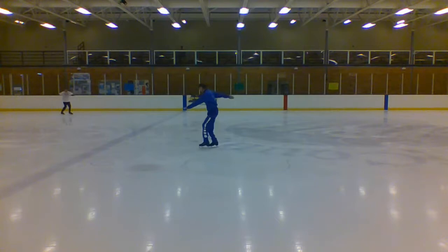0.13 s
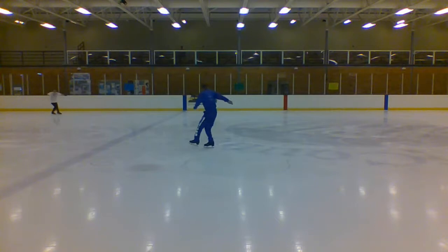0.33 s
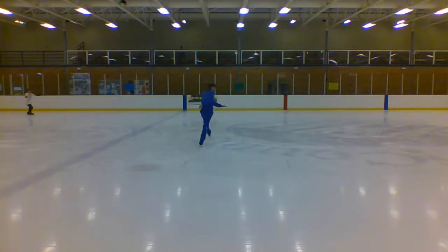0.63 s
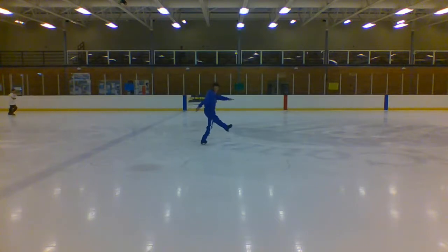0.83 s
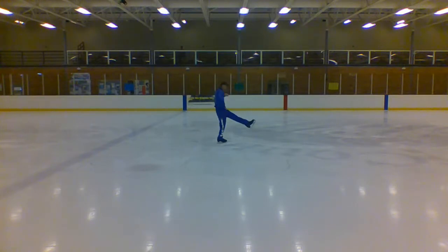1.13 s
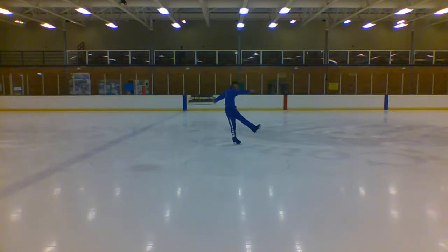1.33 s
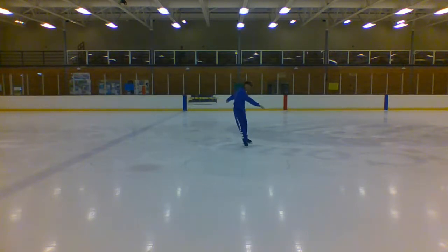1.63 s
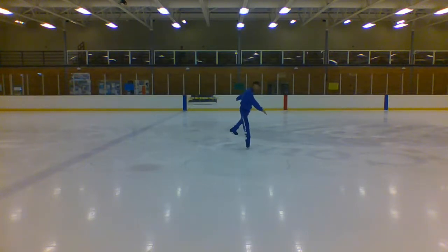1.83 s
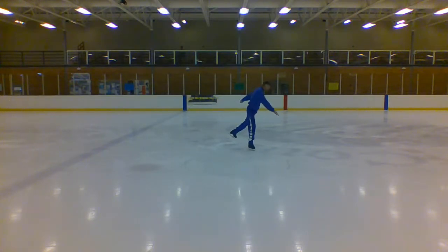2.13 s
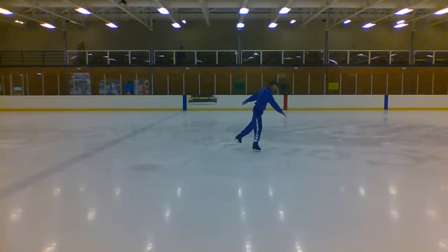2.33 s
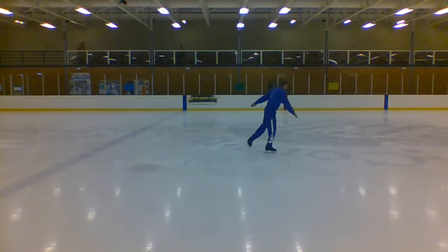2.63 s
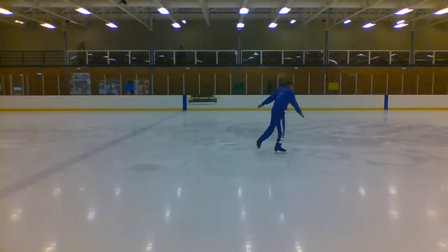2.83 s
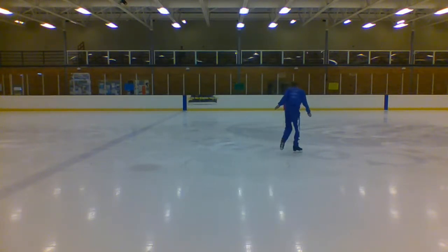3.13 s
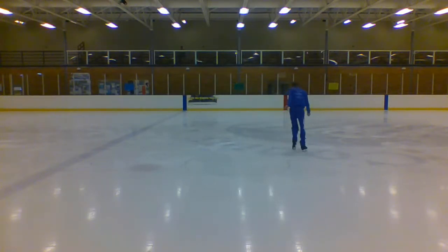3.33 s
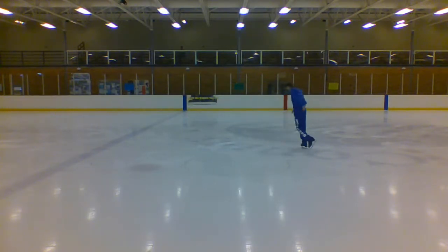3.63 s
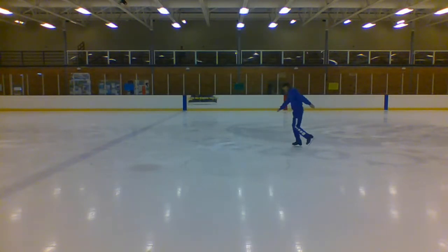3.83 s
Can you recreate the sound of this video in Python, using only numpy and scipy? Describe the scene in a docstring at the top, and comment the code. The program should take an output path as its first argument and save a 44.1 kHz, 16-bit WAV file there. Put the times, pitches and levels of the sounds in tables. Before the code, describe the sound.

Ice skate blades scrape and crunch across a large indoor rink, growing louder toward the end.

```python
"""Hard skate edges shave the ice of a large indoor rink, after faint touches of the blade.
Ice breaks away in dense random clicks, filtered by the colour of the ice sheet and the steel.
Short scuffs are band-limited bursts of the same clicks; low thumps are decaying sines.
The hall adds a long diffuse tail by convolution, over quiet, burbling ventilation noise.
A noise suppressor and two cut-off filters then shape the whole sound."""
import sys
import numpy as np
from scipy import signal
from scipy.fft import rfft, irfft
from scipy.io import wavfile
from scipy.ndimage import uniform_filter1d

SR = 44100
rng = np.random.default_rng(int(sys.argv[2]) if len(sys.argv) > 2 else 0)


def to_wav(sig):
    """Store sig (one row per channel, or 1-D mono) as 16-bit WAV at the path in sys.argv[1].

    Samples outside -1..1 are clipped; the rate is SR.
    """
    pcm = np.clip(np.atleast_2d(sig), -1, 1) * 32767
    pcm = np.round(pcm).astype(np.int16)
    wavfile.write(sys.argv[1], SR, pcm.T)  # frames by channels


N = 176400  # samples

# Hard edges, one list a stroke: (time [s], low rumble in the ice [dB], body [dB], crunch [dB],
# scrape [dB], spray hiss [dB])
EDGE_STROKES = [
    [(2.255, -56, -74, -68, -73, -73), (2.267, -52, -62, -66, -61, -72), (2.289, -51, -52, -60, -66, -61),
     (2.301, -50, -50, -46, -54, -56), (2.317, -76, -44.5, -49, -53.5, -54),
     (2.375, -50, -54.5, -46.5, -56.5, -58), (2.395, -51, -51, -50, -55.5, -65),
     (2.431, -43.5, -51.5, -48.5, -62.5, -59), (2.459, -55, -58.5, -43, -54, -62),
     (2.489, -48.5, -42, -55, -53.5, -62), (2.503, -47.5, -59, -49.5, -51, -63.5),
     (2.571, -44, -49, -53, -61.5, -66), (2.59, -61, -59, -54, -56.5, -64)],
    [(2.6, -64, -55.5, -51, -53, -69), (2.636, -42, -42.5, -44.5, -48, -41.5),
     (2.668, -49, -40.5, -38, -39, -39.5), (2.772, -35.5, -40, -36.5, -36, -41.5),
     (2.792, -41.5, -46.5, -33, -42.5, -44), (2.842, -46, -37.5, -35, -41.5, -41.5),
     (2.912, -37.5, -37.5, -36.5, -43, -58), (2.958, -49, -44.5, -40, -39.5, -52.5),
     (3.07, -50, -47.5, -46.5, -50, -66), (3.176, -48, -50, -39.5, -44.5, -61.5),
     (3.276, -48.5, -47, -46.5, -53, -67), (3.346, -47, -53.5, -45, -54, -68),
     (3.385, -48.5, -58, -60.5, -49.5, -69.5)],
    [(3.395, -44.5, -40.5, -47.5, -54.5, -56.5), (3.437, -39.5, -47, -46, -47, -49),
     (3.455, -47, -40.5, -40, -43, -45.5), (3.477, -47.5, -43, -47, -39, -41),
     (3.583, -40.5, -35, -35.5, -29, -34.5), (3.609, -41, -28.5, -32, -27, -29.5),
     (3.645, -27.5, -28.5, -31, -32, -31.5), (3.675, -40, -32.5, -32, -33, -32),
     (3.735, -31.5, -36.5, -33.5, -31, -38), (3.755, -39, -34, -36, -30, -40.5),
     (3.797, -44, -36, -36, -32, -42.5), (3.957, -36, -44.5, -36, -41.5, -58.5),
     (4.0, -48, -31, -39.5, -41.5, -55)],
]
# Centres of the five level columns of an edge: (frequency [Hz])
EDGE_REGIONS_HZ = [170, 470, 1330, 3300, 5600]
# Spectral colour of the shaved ice: (frequency [Hz], relative density [dB per Hz])
ICE_COLOUR = [(40, -15.5), (86, -19.5), (138, 0), (183, -2.5), (393, 1), (428, 0.5), (676, -3), (1120, -3),
              (1580, -5.5), (2490, -3), (2780, -4), (3170, -0.5), (4000, -1), (4600, -8.5), (5340, -10),
              (7240, -24)]
# Scuffs and bites of the blade: (start [s], rise [s], length [s], level [dB], centre [Hz], width [octaves])
BLADE_TOUCHES = [(0.101, .003, 0.06, -53.5, 1760, 0.35), (0.106, 0.026, 0.16, -60.5, 3440, 0.54),
                 (0.175, .015, 0.1, -55, 810, 1.36), (0.286, .012, .15, -53.5, 500, 0.67),
                 (0.297, .0015, 0.008, -41, 1640, 0.29), (0.298, .003, 0.12, -59.5, 3340, 0.5),
                 (0.323, .002, .012, -50, 1250, 0.39), (0.36, .015, 0.06, -51.5, 1200, 1.26),
                 (0.41, .008, 0.04, -56, 900, 1.1), (0.456, .008, .03, -55.5, 1310, 0.25),
                 (0.51, .006, 0.025, -55, 1480, 0.76), (0.628, .006, .015, -62, 1290, 0.21),
                 (0.719, .015, 0.06, -61, 1340, 0.72), (1.071, .006, 0.023, -52.5, 1250, 0.42),
                 (1.07, .002, 0.091, -64.5, 4450, 0.64), (1.092, .015, .06, -55.5, 770, 0.86),
                 (1.158, .02, 0.08, -64, 1530, 0.4), (1.477, .025, 0.09, -58.5, 1300, 0.35),
                 (1.633, .015, .04, -69, 1230, 0.4), (2.115, .02, 0.061, -67, 730, 0.23),
                 (2.264, .001, 0.008, -50, 1100, 0.41), (2.299, .003, .02, -52.5, 1500, 1),
                 (2.766, .004, .012, -39.5, 2600, 0.65), (2.873, .004, 0.013, -37, 2220, 0.81),
                 (3.396, .001, 0.013, -43, 910, 1.8), (3.45, .003, .015, -46, 4200, 0.21),
                 (3.591, .003, .012, -35.5, 3100, 0.45), (3.608, .002, .008, -38.5, 1500, 1.6),
                 (3.648, .003, .01, -35.5, 1000, .9), (3.749, .005, .02, -39, 1500, .8)]
# Soft low thumps: (time [s], peak level [dB], frequency [Hz])
LOW_THUMPS = [(0.024, -51.5, 132), (0.105, -60, 158), (0.164, -57, 120), (0.24, -49, 165),
              (0.459, -45.5, 129), (0.51, -47.5, 232), (0.565, -47, 127), (0.585, -49, 127),
              (0.702, -48.5, 127), (1.14, -53.5, 135), (1.167, -49, 221), (1.22, -50, 140),
              (1.351, -54, 202), (1.515, -53, 316), (1.644, -47.5, 134), (1.676, -54, 160),
              (1.755, -64, 188), (1.9, -54, 130), (2.054, -48, 143), (2.145, -60, 137), (2.219, -46, 141),
              (2.271, -41.5, 129), (2.338, -37, 121), (2.388, -41, 151), (2.449, -48, 340),
              (2.631, -33, 298), (2.702, -32, 328), (2.72, -31, 390), (2.766, -34.5, 137),
              (2.832, -31.5, 240), (2.879, -32.5, 260), (2.896, -33.5, 125), (2.926, -41, 264),
              (3.1, -38.5, 218), (3.171, -37.5, 200), (3.254, -36, 256), (3.393, -36, 243),
              (3.42, -31.5, 152), (3.44, -29, 141), (3.506, -32, 336), (3.586, -30.5, 444),
              (3.613, -24, 433), (3.634, -31, 143), (3.695, -28, 428), (3.708, -37.5, 145),
              (3.734, -26, 150), (3.757, -30, 350), (3.888, -35, 447)]
# Reverberation time of the hall: (frequency [Hz], time to fall 60 dB [s])
HALL_DECAY = [(100, 2.6), (1000, 2.03), (3500, 2.3), (7000, 1)]
# Spectrum of the ventilation: (frequency [Hz], relative density [dB per Hz])
VENTILATION_COLOUR = [(30, -32.5), (133, -5.5), (291, -9.5), (342, -10.5), (392, -12), (566, -15.5),
                      (1240, -17), (1830, -23), (3000, -26), (5000, -28), (7240, -39)]
# Third-octave band centres: (frequency [Hz])
BANDS_HZ = 45 * 2 ** (np.arange(23) / 3)

# Ice chips: mean rate, mean excess of the random size and its cap in means, scatter decay
CHIPS_PER_S, CHIP_SPREAD_DB, CHIP_CAP, CHIP_SCATTER_S = 4000, 1.5, 6, 0.0031
# Unevenness of the edges: all bands together, each band alone
EDGE_SHARED_DB, EDGE_OWN_DB = 0.54, 1.5
# Touches: flicker, fade over the length, shortest release, added release per second of length
TOUCH_STUTTER_DB, TOUCH_FADE_DB, TOUCH_RELEASE_S, TOUCH_LINGER = 1, -8, 0.022, 0.19
# Thumps: rise at 200 Hz, and the power of pitch by which higher ones shorten
THUMP_RISE_S, THUMP_SHRINK = 0.0063, 0.39
HALL_DB, HALL_FADE_IN_S = -12, 0.027
# Ventilation: rms level, slow swell, flicker at 1 kHz and its slight growth with pitch (power)
VENTILATION_DB, SWELL_DB, BURBLE_DB, BURBLE_TILT = -59.5, 1.2, 2.5, 0.0058
BASS_THROB_DB, BASS_HZ = 0.5, 305  # common throb, halved in dB at BASS_HZ
# Noise suppressor: threshold over the recent mean, memory, exponent of the gain
HUSH_DB, HUSH_S, HUSH_POWER = 9.5, 0.04, 0.26
LOW_CUT_HZ, TOP_HZ = 59, 7500


def edges(t, grains):
    """Subtractive synthesis: broadband chip noise takes the ice colour and regional level curves."""
    rows = np.vstack(EDGE_STROKES)
    times, region_db = rows[:, 0], rows[:, 1:]
    colour = on_log(ICE_COLOUR, BANDS_HZ) + 10 * np.log10(BANDS_HZ)  # density to band level
    # each band's share in the five regions, blended along log frequency
    share = np.array([np.interp(np.log(BANDS_HZ), np.log(EDGE_REGIONS_HZ), one)
                      for one in np.eye(len(EDGE_REGIONS_HZ))])
    colour_power = share @ undb(colour) ** 2
    lift = region_db - 10 * np.log10(colour_power)
    band_curves = (lift @ share).T
    shared = EDGE_SHARED_DB * walk(24.79)
    out = np.zeros(N)
    for colour_db, curve, grain in zip(colour, band_curves, grains):
        level = colour_db + np.interp(t, times, curve, left=-140)
        own = EDGE_OWN_DB * (walk(30) + walk(9))
        out += grain * undb(level + shared + own)
    return out


def chips():
    """Fracture as a random impulse process: uneven clicks, each smeared by a flat-spectrum scatter."""
    excess = np.minimum(rng.exponential(size=N), CHIP_CAP)
    size = undb(CHIP_SPREAD_DB * excess) * rng.standard_normal(N)
    clicks = size * (rng.random(N) < CHIPS_PER_S / SR)
    n = np.arange(2048)
    scatter = rng.standard_normal(2048) * np.exp(-n / SR / CHIP_SCATTER_S)
    spectrum = rfft(scatter, 4096)
    flat_scatter = irfft(spectrum / np.abs(spectrum))  # keep only the phase
    return signal.fftconvolve(clicks, flat_scatter)[:N]


def touches(t, grains):
    """Brief friction as band-limited bursts: chip noise under a Gaussian of log frequency."""
    out = np.zeros(N)
    stutter = np.array([walk(45) for _ in BANDS_HZ])
    grains = grains * undb(TOUCH_STUTTER_DB * stutter)
    for start, rise, length, db, hz, octaves in BLADE_TOUCHES:
        u = t - start
        release = TOUCH_RELEASE_S + TOUCH_LINGER * length
        env = np.clip(u / rise, 0, 1) * np.exp(-np.clip(u - rise - length, 0, None) / release)
        env = env * undb(TOUCH_FADE_DB * np.clip((u - rise) / length, 0, 1))
        shape = np.exp(-.5 * (np.log2(BANDS_HZ / hz) / octaves) ** 2)
        burst = (shape @ grains) / np.sqrt(np.sum(shape ** 2))
        out += undb(db) * env * burst
    return out


def thumps(t):
    """Critically damped envelope: each low sine swells, then dies within a few cycles."""
    out = np.zeros(N)
    for start, db, hz in LOW_THUMPS:
        u = np.clip(t - start, 0, None)
        v = u / (THUMP_RISE_S * (200 / hz) ** THUMP_SHRINK)
        env = v * np.exp(1 - v)  # peaks at 1
        out += undb(db) * env * np.sin(2 * np.pi * hz * u)
    return out


def hall(x, t):
    """Diffuse reverberation: convolution with noise whose exponential decay depends on frequency."""
    tail = np.zeros(N)
    for hz in BANDS_HZ:
        decay = undb(-60 * t / on_log(HALL_DECAY, hz))
        tail += band(rng.standard_normal(N), hz) * np.sqrt(hz) * decay
    tail = tail * np.clip(t / HALL_FADE_IN_S, 0, 1)
    unit_tail = tail / np.sqrt(np.sum(tail ** 2))
    return signal.fftconvolve(x, unit_tail)[:N] * undb(HALL_DB)


def ventilation():
    """Broadband flow noise with random modulation: bands flicker alone, and the bass throbs as one."""
    swell, throb = walk(2.35), walk(39.93)
    out = np.zeros(N)
    for hz in BANDS_HZ:
        flicker = BURBLE_DB * (hz / 1000) ** BURBLE_TILT * walk(14.92)
        bass_throb = BASS_THROB_DB * throb / (1 + (hz / BASS_HZ) ** 2)
        level = on_log(VENTILATION_COLOUR, hz) + SWELL_DB * swell + flicker + bass_throb
        out += band(rng.standard_normal(N), hz) * np.sqrt(hz) * undb(level)
    return out * undb(VENTILATION_DB) / np.sqrt(np.mean(out ** 2))


def undb(db):
    """Amplitude ratio from decibels, by the 20 log rule."""
    return 10 ** (np.asarray(db) / 20)


def on_log(table, hz):
    """Linear interpolation of a (frequency [Hz], value) table along log frequency."""
    table = np.array(table)
    return np.interp(np.log(hz), np.log(table[:, 0]), table[:, 1])


def band(x, hz):
    """Third-octave filtering to rms 1; cosine-squared edges add up flat with the neighbours."""
    away = 3 * np.log2(np.fft.rfftfreq(N, 1 / SR) / hz + 1e-9)  # third octaves from the centre
    y = irfft(rfft(x) * np.cos(np.pi / 2 * np.clip(away, -1, 1)) ** 2, N)
    return y / np.sqrt(np.mean(y ** 2))


def walk(rate):
    """Low-pass random modulation: values held for 1 / rate [s], averaged twice, spread near 1."""
    k = int(SR / rate)
    steps = np.repeat(rng.standard_normal(N // k + 1), k)
    return 1.3 * uniform_filter1d(uniform_filter1d(steps, k), k)[:N]


def scene():
    """Superposition: the blade also excites the hall; thumps and ventilation are added direct."""
    t = np.arange(N) / SR
    clicks = chips()
    grains = np.array([band(clicks, hz) for hz in BANDS_HZ])
    blade = edges(t, grains) + touches(t, grains)
    return (blade + hall(blade, t) + thumps(t) + ventilation())[None]


def record(dry):
    """Spectral noise suppression: gain follows power against its recent mean; bass and top are cut."""
    z = signal.stft(dry, nperseg=768)[2]
    power = np.abs(z) ** 2 + 1e-18
    keep = np.exp(-384 / SR / HUSH_S)  # memory over one hop of 384 samples
    start = keep * power[..., :16].mean(axis=-1, keepdims=True)
    recent = signal.lfilter([1 - keep], [1, -keep], power, zi=start)[0]
    mean = uniform_filter1d(recent, 9, axis=-2)  # across neighbouring frequencies
    gain = (2 * power / (power + undb(HUSH_DB) ** 2 * mean)) ** HUSH_POWER
    hushed = signal.istft(z * gain, nperseg=768)[1][:, :N]
    low_cut = signal.butter(3, LOW_CUT_HZ, "high", fs=SR, output="sos")
    top_cut = signal.ellip(14, .2, 80, TOP_HZ, fs=SR, output="sos")
    return signal.sosfilt(top_cut, signal.sosfilt(low_cut, hushed))


dry = scene()
out = record(dry)
to_wav(out)
```